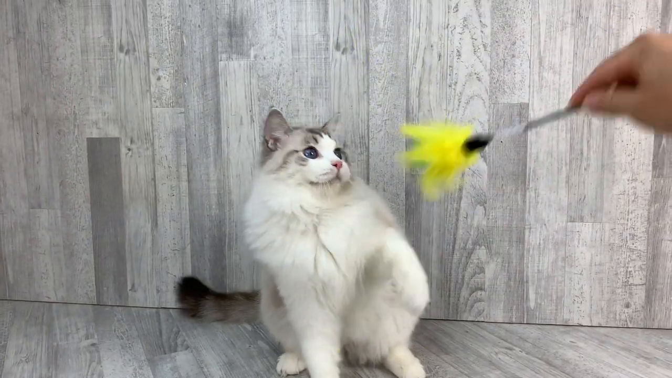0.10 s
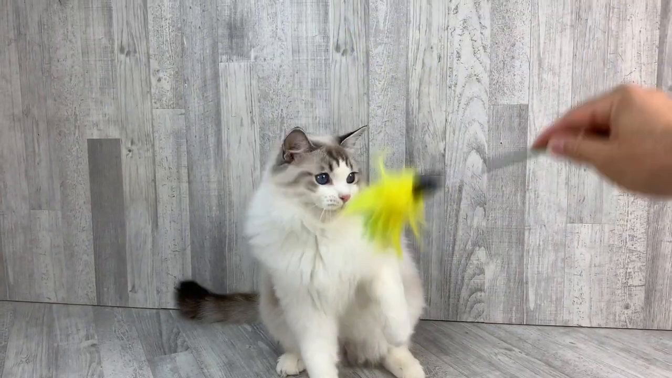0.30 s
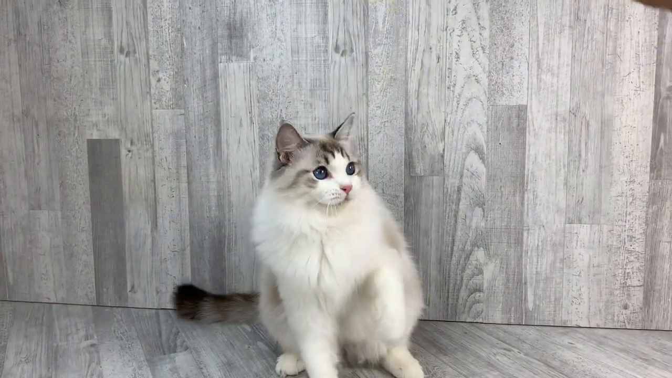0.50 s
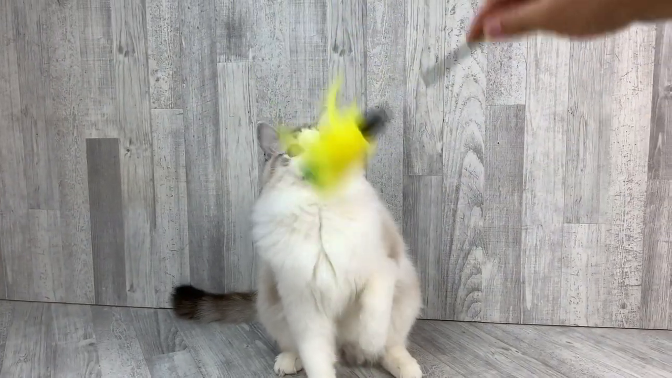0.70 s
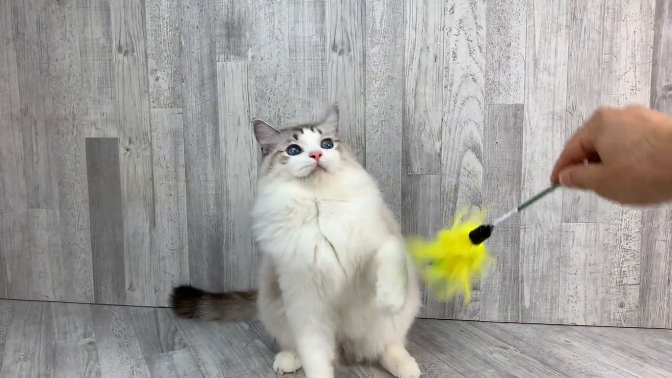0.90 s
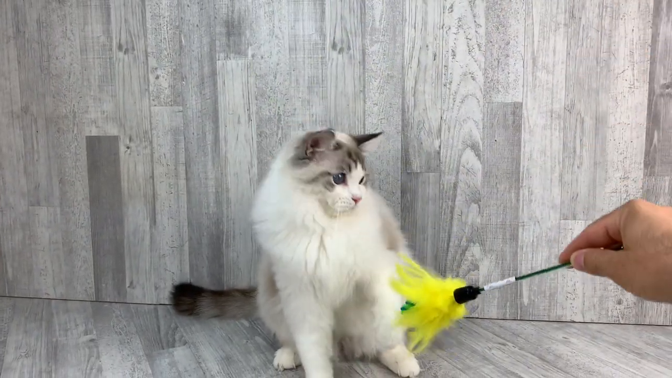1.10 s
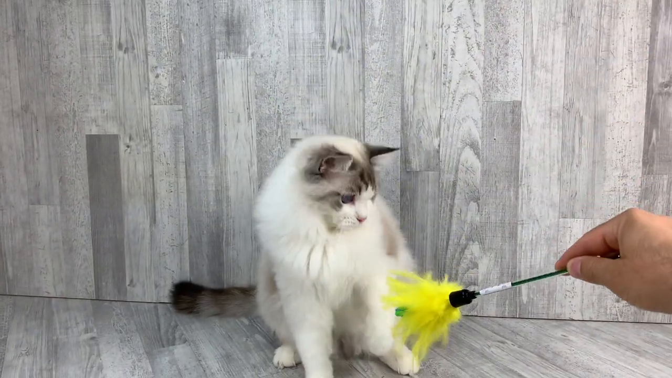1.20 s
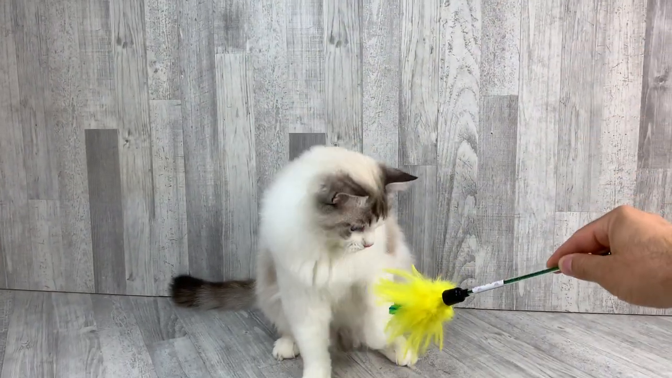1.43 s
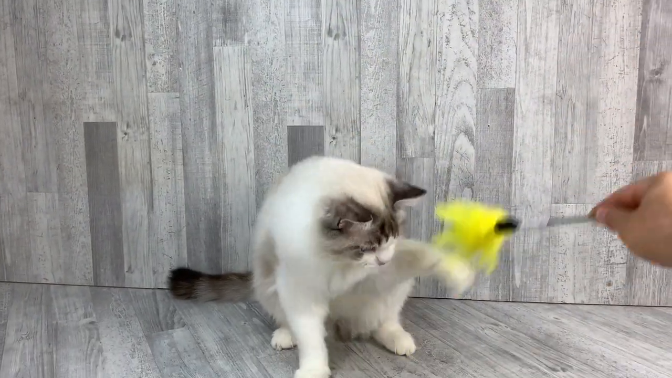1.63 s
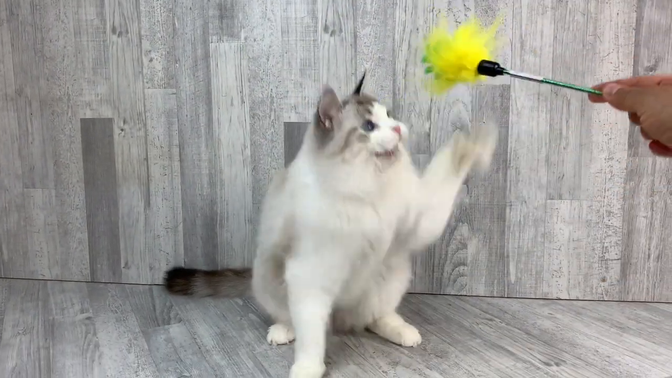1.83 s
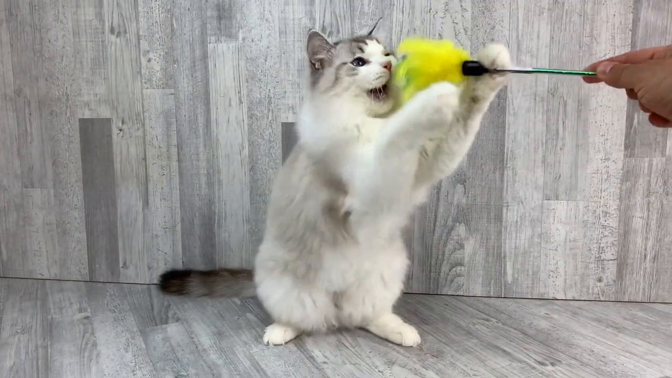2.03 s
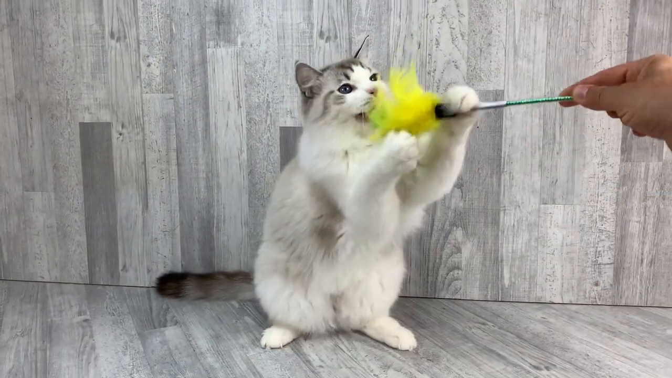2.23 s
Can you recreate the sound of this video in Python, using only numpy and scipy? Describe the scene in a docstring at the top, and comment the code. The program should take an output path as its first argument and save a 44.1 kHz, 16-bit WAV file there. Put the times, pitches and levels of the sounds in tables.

```python
"""A small, hard-walled room, where a plastic wand toy is shaken for a cat.
At each flick its loose parts collide and bounce a few times within milliseconds; the room rings on.
Underneath lie quiet room noise, a low drone that swells, and the soft rumble of movement.
The clacks are nearly mono in the high treble; a fast limiter holds down the hardest."""
import sys
import numpy as np
from scipy import signal
from scipy.fft import rfft, irfft
from scipy.io import wavfile
from scipy.ndimage import uniform_filter1d, minimum_filter1d

SR = 44100
rng = np.random.default_rng(int(sys.argv[2]) if len(sys.argv) > 2 else 0)


def bounce(signal):
    """Save signal as a 16-bit WAV file at the path given by the first command-line argument."""
    frames = np.transpose(np.atleast_2d(signal))
    limited = np.clip(frames, -1, 1)
    pcm = np.round(limited * 32767).astype(np.int16)
    wavfile.write(sys.argv[1], SR, pcm)


N = 101430


def amp(db):
    """Decibels to gain."""
    return 10 ** (np.asarray(db) / 20)


def unit_rms(x):
    """Scale to rms 1."""
    return x / np.sqrt(np.mean(x ** 2) + 1e-20)


def at_hz(table, hz):
    """Interpolate a table over log frequency."""
    f, value = np.transpose(table)
    return np.interp(np.log(hz + 1), np.log(f + 1), value)


def envelope(table):
    """Gain per sample from rows of t/s, level/dB."""
    return amp(np.interp(np.arange(N) / SR, *np.transpose(table)))


def add(mix, start_s, sound):
    """Mix in a stereo sound, which may start before t = 0."""
    at = round(start_s * SR)
    sound = sound[:, max(-at, 0):]
    part = mix[:, max(at, 0):][:, :sound.shape[1]]
    part += sound[:, :part.shape[1]]


def minimum_phase(db):
    """Causal frequency response with the given gain."""
    log_gain = np.log(amp(np.r_[db, db[-2:0:-1]]))
    return np.exp(np.conj(signal.hilbert(log_gain)))[:len(db)]


def stereo(independent, correlation):
    """Two independent signals to partly correlated left and right."""
    a, b = independent
    c = np.clip(correlation, -1, 1)
    return np.array([a, c * a + np.sqrt(1 - c ** 2) * b])


def whiten(spectrum, bins):
    """Remove broad colour, keep fine ripple."""
    power = uniform_filter1d(abs(spectrum) ** 2, bins, axis=-1)
    return spectrum / np.sqrt(abs(power) + 1e-12)


def rattle(length_s, t, contacts=12, gap_s=.0012, ring_s=.0004, first_touch_db=-7):
    """Whitened spectrum of a light first touch and quick bounces, each a tick with a brief ring."""
    gap_jitter, level_jitter = rng.uniform(-1, 1, (2, contacts))
    starts_s = np.r_[0, np.cumsum(gap_s * (1 + .5 * gap_jitter[1:]))]
    levels_db = .5 * level_jitter + first_touch_db * (starts_s == 0)
    ring = .6 * np.exp(-t[:128] / ring_s)
    out = np.zeros((2, len(t)))
    for start_s, level_db in zip(starts_s, levels_db):
        contact = ring * rng.standard_normal((2, len(ring)))
        contact[:, 0] += 1  # tick
        fade_db = -3 * min(start_s / length_s, 3) ** 4
        add(out, start_s, contact * amp(level_db + fade_db))
    return whiten(rfft(out), bins=600)


# Clack colour, steep treble cut near 16.5 kHz: f/Hz, level/dB
CLACK_SPECTRUM = [(100, -44.5), (450, -38.5), (750, -25), (1150, -22), (1400, -24.5), (2200, -18),
                  (4000, -16), (5200, -12), (6200, -12), (7400, -8.5), (8300, -2), (9500, 2), (10900, 4.5),
                  (12500, 2), (13500, -1.5), (15500, -2.5), (16500, -27)]
# Resonances of the parts: f/Hz, width/Hz, lift/dB
PLASTIC_MODES = [(840, 150, -1), (1120, 66, -0.5), (2476, 110, 5.5), (4890, 150, 4.5), (5300, 130, 2.5),
                 (6100, 64, 2), (10400, 69, 4.5)]


def clack_colour(hz, knock_db, body_db, ring_db, sheen_db, hollow_hz, ring_hz):
    """Broad colour plus the plastic's resonances; two depend on where the parts meet."""
    tint = [(900, knock_db), (2300, body_db), (5300, ring_db), (10800, 0), (14800, sheen_db)]
    modes = [*PLASTIC_MODES, (hollow_hz, 320, 9), (ring_hz, 500, 5)]
    modes_db = sum(lift / (1 + (2 * (hz - f) / width) ** 2) for f, width, lift in modes)
    return minimum_phase(at_hz(CLACK_SPECTRUM, hz) + at_hz(tint, hz) + modes_db)


# Room decay: f/Hz, T60/s
ROOM_DECAY = [(300, .34), (1500, .33), (5000, .29), (10000, .26), (16000, .22)]
# Colour of the reflected sound, steep treble cut near 16 kHz: f/Hz, level/dB
REVERB_SPECTRUM = [(300, 3.5), (1000, -2), (3500, 6.5), (5200, 5.5), (7000, 2), (9000, -4.5), (12500, -3.5),
                   (14000, -2.5), (15600, -2), (16000, -20), (17000, -29.5)]


def room(t, hz, first_echo_s=.002, early_decay_s=.006, early_db=-5.5, tail_db=-3):
    """Spectrum of close wall and floor echoes and a tail that dies sooner in the treble."""
    tail_noise, echoes = rng.standard_normal((2, 2, len(t)))
    band_hz, frame_s, frames = signal.stft(tail_noise, SR, nperseg=256)
    decay = amp(-60 * frame_s / at_hz(ROOM_DECAY, band_hz)[:, None])
    tail = signal.istft(frames * decay, SR, nperseg=256)[1][:, :len(t)]
    early = echoes * abs(echoes) * np.exp(-t / early_decay_s)
    onset = np.clip(t / first_echo_s - 1, 0, 1)
    response = amp(tail_db) * unit_rms(tail * onset) + amp(early_db) * unit_rms(early * onset)
    return rfft(response) / np.sqrt(len(t)) * amp(at_hz(REVERB_SPECTRUM, hz))


# Direct sound: f/Hz, left-right correlation
DIRECT_CORRELATION = [(200, .95), (1200, .92), (2500, .4), (6000, .3), (7000, .85), (8300, .995),
                      (16000, .99)]
# Reflected sound: f/Hz, left-right correlation
ROOM_CORRELATION = [(200, .9), (700, .6), (2000, -.1), (5300, -.15), (6200, .1), (7300, .55), (8300, .99),
                    (8800, .99), (9700, .8), (10900, .99), (12200, .85), (13300, .99), (13800, .99),
                    (14700, .8), (15800, .92)]
# Stereo balance: f/Hz, left minus right/dB
STEREO_BALANCE = [(500, 1), (1500, 0.5), (3500, 0), (5300, -5), (7000, 0.5), (11000, 0)]
# Stereo phase: f/Hz, left minus right/rad
STEREO_PHASE = [(50, 0), (2000, .7), (6300, 0), (7000, -1.2), (8550, -3.14), (9750, -4.8), (11000, -6.28),
                (12300, -7.9), (13550, -9.42), (16000, -12.4)]


def stereo_image(direct, reflected, hz):
    """Left and right spectra: nearly mono above 7 kHz, with the right slightly ahead there."""
    channels = stereo(direct, at_hz(DIRECT_CORRELATION, hz))
    channels += stereo(reflected, at_hz(ROOM_CORRELATION, hz))
    channels *= amp(np.outer([.5, -.5], at_hz(STEREO_BALANCE, hz)))
    channels[0] *= np.exp(1j * at_hz(STEREO_PHASE, hz))
    return channels


def clack(length_s, timbre, room_db, size=16384):
    """One collision: the rattle excites the plastic, heard directly and off the walls."""
    t, hz = np.arange(size) / SR, np.fft.rfftfreq(size, 1 / SR)
    direct = rattle(length_s, t)
    towards_walls = amp(room_db) * whiten(rattle(length_s, t)[0], bins=200)
    reflected = towards_walls * room(t, hz)
    spectrum = stereo_image(direct, reflected, hz) * clack_colour(hz, *timbre)
    return irfft(spectrum)[:, :size * 7 // 8]  # drop wrapped pre-ring


# Collisions: t/s, relative level/dB, rattle length/s,
# knock/dB, body/dB, ring/dB, sheen/dB, hollow f/Hz, ring f/Hz, room send/dB
WAND_COLLISIONS = [(-0.045, -31, 0.0039, 1, -6, 2, 0.5, 1200, 5300, -1),
                   (0.0521, -39, 0.0025, -2, -4, -11.5, -9, 1100, 8300, -0.5),
                   (0.0587, -45, 0.002, -12, -7, 0.0, -5, 1150, 5250, -1),
                   (0.0749, -43, 0.00057, 2.5, -5, 4, -1.0, 1120, 6400, -1),
                   (0.1577, -29, 0.0027, 6, 0.0, -0.5, 0, 1830, 5040, 6),
                   (0.232, -18, 0.0012, 11.5, 9, 4, -1.5, 1810, 4400, 5.5),
                   (0.3013, -17.5, 0.002, 6, -4.5, 4.5, 2.5, 1750, 6300, 2),
                   (0.3649, -7.5, 0.0047, -1, -6, 4, 0, 1850, 5920, -2.5),
                   (0.425, -24.5, 0.0043, 4.5, -1.0, -19, 1.5, 1710, 4480, 3.5),
                   (0.4483, -35, 0.00089, 9, -16, 6.0, 2, 1610, 5160, 8),
                   (0.5081, -12.5, 0.0021, 2.5, 3.0, -4.0, -3, 1570, 5600, 2),
                   (0.562, -27.5, 0.0055, 9, -9, 5.5, 4.5, 660, 6740, 5.5),
                   (0.6344, -11, 0.0024, 4, 1, 6.5, 4, 1900, 5000, -0.5),
                   (0.7043, -7.5, 0.0041, 2, 0.5, -4, -10.5, 1700, 4389, 2),
                   (0.7745, -13, 0.0015, -3, 3.5, -8, -5.5, 1560, 7560, 1.5),
                   (0.8505, -30.5, 0.0022, -16, -31, 4, 7.5, 1710, 5200, 1),
                   (0.9529, -51, 0.0045, 13, 7, 20, -6, 700, 6430, 4),
                   (0.9605, -23, 0.003, -1, -0.5, 4, 1.5, 650, 6430, 1.5),
                   (1.022, -14, 0.0031, -4, -5.5, -4, -3.5, 660, 5500, 1.5),
                   (1.0668, -28, 0.0012, 6.5, -6, 3, -1, 1880, 7400, 4.5),
                   (1.1288, -34, 0.003, 3, -0.5, -9, -2, 920, 5648, 3.5),
                   (1.156, -37.5, 0.0039, -5.5, -3.5, 3, 3, 965, 4800, -5.5),
                   (1.287, -64, 0.001, -8.0, -8.0, -24, -10.5, 1134, 5200, -6),
                   (1.676, -34.5, 0.0044, 1.5, -8.5, -11.5, -6, 890, 5130, 5.5),
                   (1.7013, -45, 0.0029, 3.5, -1.0, 5.5, 12, 670, 5560, 1),
                   (1.7081, -55, 0.00096, 17, 3, 6, 11, 1860, 6472, 12.5),
                   (1.7368, -38.5, 0.0025, 10, 8, 1, 1, 1700, 6444, 3),
                   (1.8103, -13.5, 0.0016, 0.0, -1.5, -3.5, 3.5, 1170, 4400, 3.5),
                   (1.8797, -12.5, 0.0034, 6, 10.5, 5.5, -3, 1100, 4600, -0.5),
                   (1.9456, -20, 0.0075, 3, -7, 7, 5, 1170, 5700, -1.5),
                   (1.9698, -27.5, 0.001, -18, -3, 4.5, 1, 1880, 4898, 4.5),
                   (1.986, -10, 0.0037, 2, -1.0, 1, 2.5, 2000, 5400, -1),
                   (2.0302, -15.5, 0.0028, 10, 14, 0.5, -11, 1160, 4074, -0.5),
                   (2.1342, -41.5, 0.0011, -2.0, -37, 7.5, 8.0, 1750, 6440, 9.5),
                   (2.2296, -28.5, 0.0029, 5.0, -5, 4.5, 3.5, 1160, 5660, 1.5),
                   (2.2597, -37.5, 0.001, -10, -9, -9, -5, 1310, 5400, 6.5)]


def wand(gain_db=25):
    """The shaken toy: one clack per collision of its loose parts."""
    out = np.zeros((2, N))
    for start_s, level_db, length_s, *timbre, room_db in WAND_COLLISIONS:
        add(out, start_s, amp(level_db + gain_db) * clack(length_s, timbre, room_db))
    return out


def coloured_noise(gain):
    """Nearly mono noise, shaped by a gain per bin, at rms 1."""
    white = stereo(rng.standard_normal((2, N)), correlation=.87)
    return unit_rms(irfft(rfft(white) * gain, N))


# Room noise: f/Hz, relative level/dB
ROOM_NOISE_SPECTRUM = [(20, -25), (50, -10), (100, -9.5), (170, -6.5), (230, -15.5), (450, -25), (650, -30),
                       (2000, -35.5), (8000, -43.5), (16000, -43.5)]


def room_noise(hz, rms_db=-72.5):
    """Steady, quiet noise, mostly bass."""
    return amp(rms_db) * coloured_noise(amp(at_hz(ROOM_NOISE_SPECTRUM, hz)))


# Drone tones: f/Hz, width/Hz, relative level/dB
DRONE_BANDS = [(106.6, 4, -0.5), (163.5, 18, -2)]
# Drone swell: t/s, level/dB
DRONE_ENVELOPE = [(0, -79), (.8, -93), (1.05, -74.5), (1.45, -75), (1.65, -63.5), (1.85, -60), (2.05, -64),
                  (2.3, -70.5)]


def drone(hz):
    """Two low, narrow noise bands that swell near the end."""
    tones = sum(amp(db) * coloured_noise(1 / (1 + (2 * (hz - f) / width) ** 2))
                for f, width, db in DRONE_BANDS)
    return envelope(DRONE_ENVELOPE) * tones


# Rumble colour: f/Hz, relative level/dB
RUMBLE_SPECTRUM = [(18, -21.5), (45, -0.5), (75, -2), (150, -9), (320, -11), (500, -21.5), (1200, -50),
                   (16000, -89)]
# Rumble surges: t/s, level/dB
RUMBLE_ENVELOPE = [(0, -83), (.25, -76), (.35, -63), (.45, -83), (.76, -81), (.93, -78), (1.05, -71.5),
                   (1.25, -87.5), (1.78, -77.5), (1.89, -58.5), (2.03, -56), (2.12, -65.5), (2.21, -67),
                   (2.3, -64.5)]


def rumble(hz):
    """Movement: soft surges of low noise."""
    return envelope(RUMBLE_ENVELOPE) * coloured_noise(amp(at_hz(RUMBLE_SPECTRUM, hz)))


def scene():
    """The toy over room noise, drone and rumble."""
    hz = np.fft.rfftfreq(N, 1 / SR)
    return wand() + room_noise(hz) + drone(hz) + rumble(hz)


def record(dry):
    """Fast peak limiter, then a steep low-pass."""
    ceiling, window_s, cutoff_hz = .88, .0015, 16600
    span = round(window_s * SR) | 1
    allowed_gain = ceiling / np.maximum(abs(dry).max(0), ceiling)
    limited = dry * uniform_filter1d(minimum_filter1d(allowed_gain, span), span)
    lowpass = signal.firwin(511, cutoff_hz, window=("kaiser", 9), fs=SR)
    return signal.oaconvolve(limited, lowpass[None], "same")


dry = scene()
out = record(dry)
bounce(out)
```